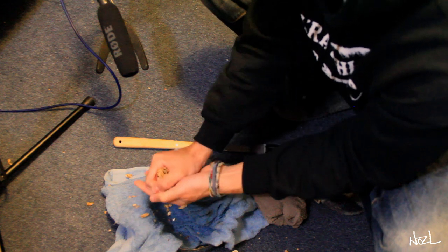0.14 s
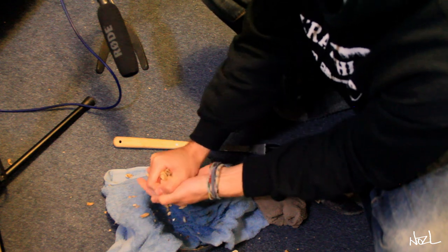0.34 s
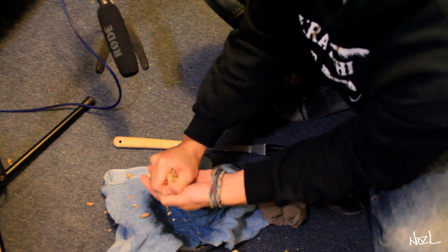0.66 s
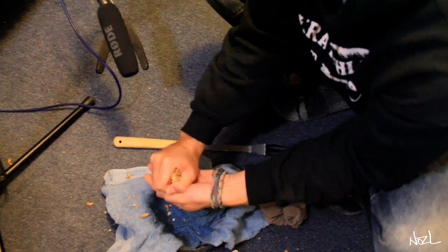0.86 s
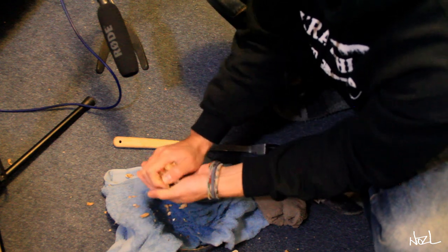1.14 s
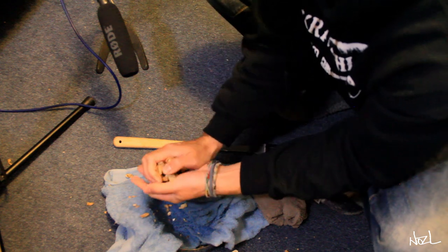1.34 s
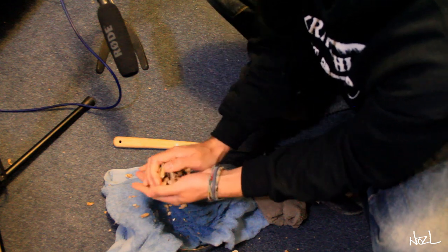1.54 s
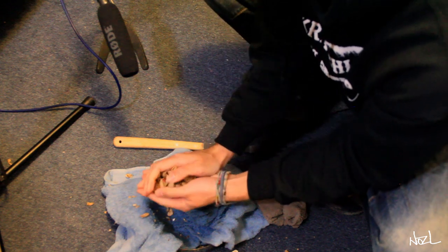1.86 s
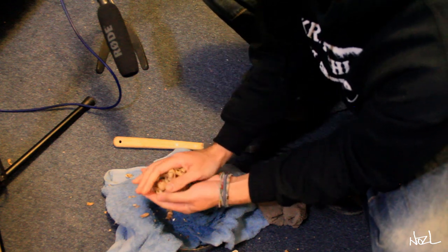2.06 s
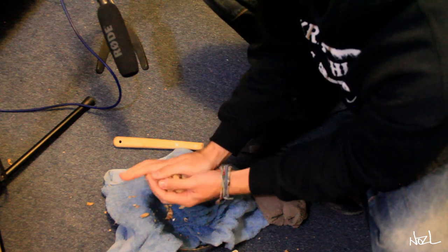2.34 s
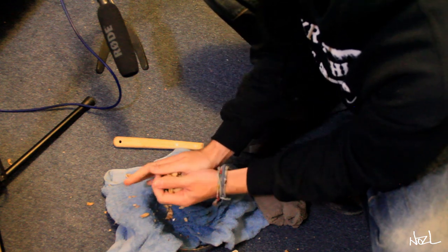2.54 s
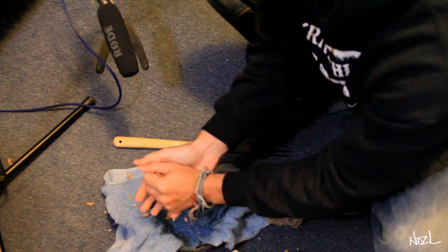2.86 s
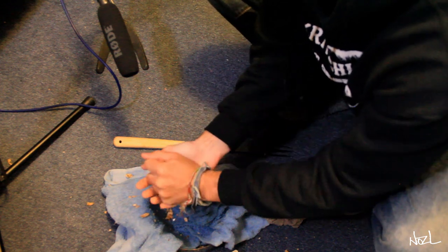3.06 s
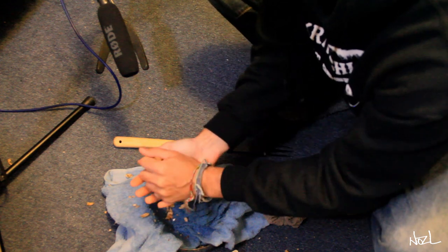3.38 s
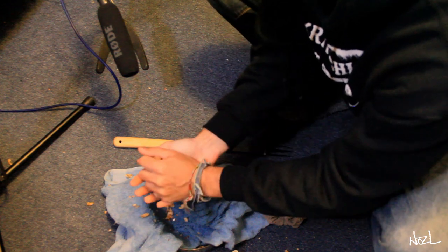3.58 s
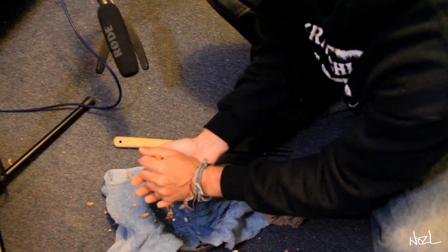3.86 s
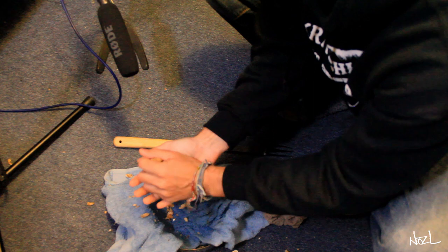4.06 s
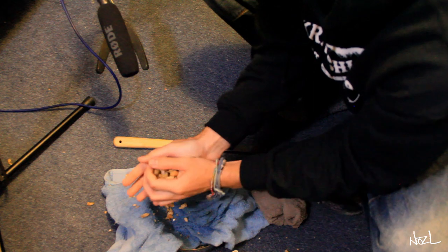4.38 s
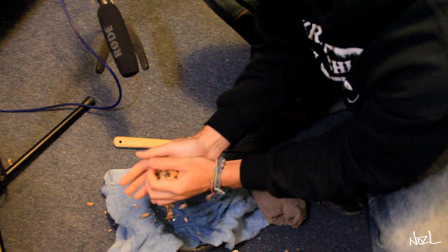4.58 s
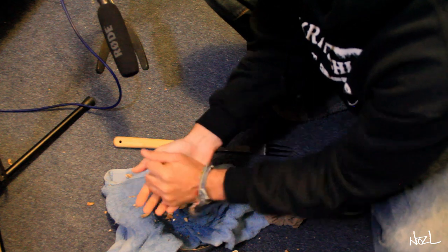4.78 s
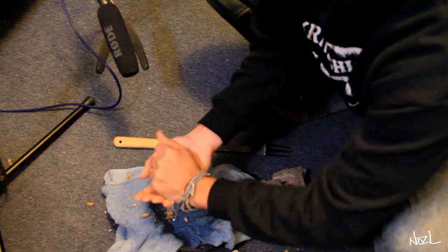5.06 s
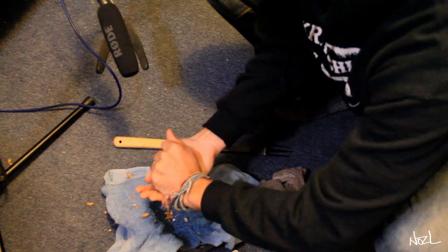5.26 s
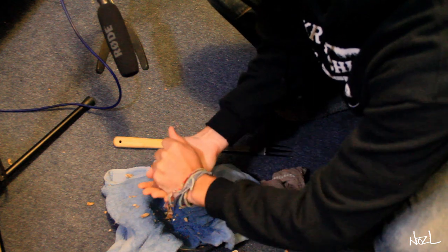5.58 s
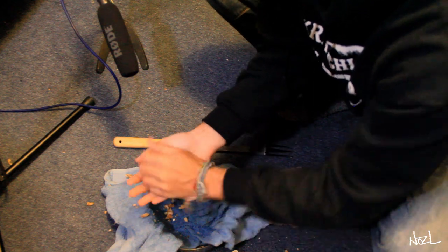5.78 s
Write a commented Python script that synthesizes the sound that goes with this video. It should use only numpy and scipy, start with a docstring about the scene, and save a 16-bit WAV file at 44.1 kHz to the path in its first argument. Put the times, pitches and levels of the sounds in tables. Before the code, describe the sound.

Dry peanut shells crack and crunch between two hands in separate bursts, close to the microphone in a small carpeted room.

```python
"""Dry peanut shells crack and crunch between two hands, close to one microphone in a small carpeted room.
Each crack is a short run of tiny breaks that rings the shell and the air pocket between the palms.
Between the cracks, loose fragments crackle and rub, louder as the hands squeeze harder.
The crackle and rub are random ticks and noise sent through ringing filters.
A low rumble and a faint hiss, both shaped noise, lie underneath."""
import sys
import numpy as np
from scipy import signal
from scipy.fft import rfft, irfft, next_fast_len
from scipy.io import wavfile

SR = 44100
rng = np.random.default_rng(int(sys.argv[2]) if len(sys.argv) > 2 else 0)


def to_wav(sig):
    """Store sig (one row per channel, or 1-D mono) as 16-bit WAV at the path in sys.argv[1].

    Samples outside -1..1 are clipped; the rate is SR.
    """
    pcm = np.clip(np.atleast_2d(sig), -1, 1) * 32767
    pcm = np.round(pcm).astype(np.int16)
    wavfile.write(sys.argv[1], SR, pcm.T)  # frames by channels


N = 261513
SIZE = 2048  # samples in one short ring
HZ = np.fft.rfftfreq(SIZE, 1 / SR)

# colour of a ringing piece of shell: (f/Hz, gain/dB)
SHELL_COLOUR = [(900, -82.5), (1950, -13.5), (2350, -3.5), (2700, -5), (3400, 0), (4200, -4), (5200, -3),
                (6300, -9.5), (8000, -28.5), (14000, -71.5)]


def amp(db):
    """Turn decibels into a gain."""
    return 10 ** (np.asarray(db) / 20)


def unit(x):
    """Scale a sound to an rms (average strength) of 1."""
    return x / np.sqrt(np.mean(x ** 2) + 1e-20)


def along(points, hz):
    """Read a curve of (f/Hz, value) points on a logarithmic frequency axis."""
    f, value = np.transpose(points)
    return np.interp(np.log(hz + 1), np.log(f + 1), value)


def filtered(x, response):
    """Change the strength of each frequency in x by response(hz)."""
    length = next_fast_len(N + SR // 2)  # spare room at the end, so that nothing wraps round
    spectrum = rfft(x, length) * response(np.fft.rfftfreq(length, 1 / SR))
    return irfft(spectrum, length)[:N]


def add(track, s, sound):
    """Mix a sound into the track from time s on."""
    start = max(round(s * SR), 0)
    track[start:start + len(sound)] += sound[:N - start]


def causal(db):
    """Give a body these gains on HZ, ringing only after it is struck (minimum phase)."""
    cepstrum = irfft(np.log(amp(db)))
    # fold the half before the strike onto the half after it
    cepstrum[1:SIZE // 2] *= 2
    cepstrum[SIZE // 2 + 1:] = 0
    return np.exp(rfft(cepstrum))


def room_tone(level_db):
    """Steady low rumble of the building with a faint hiss: noise in one fixed colour."""
    # colour of the quiet room: (f/Hz, gain/dB)
    quiet_colour = [(15, -27), (25, -8), (60, -.5), (115, -2.5), (160, -7.5), (220, -8), (350, -15),
                    (520, -21.5), (1100, -26.5), (3500, -29.5), (16000, -39)]
    noise = rng.standard_normal(N)
    return amp(level_db) * unit(filtered(noise, lambda hz: amp(along(quiet_colour, hz))))


def reflections(near_db, near_t60, room_db):
    """A fresh echo pattern: hands, sleeves and floor answer quickly, the room builds up more slowly."""
    # time the room takes to fade by 60 dB: (f/Hz, fade time/s)
    room_fade = [(300, 0.42), (1000, 0.16), (3500, 0.15), (8000, 0.11), (15000, 0.24)]
    # the room: noise in which each pitch fades at its own pace
    hz, t, bands = signal.stft(rng.standard_normal(SR // 4), SR, nperseg=256)
    fade_db = -60 * t / along(room_fade, hz)[:, None]
    room = signal.istft(bands * amp(fade_db), SR, nperseg=256)[1]
    t = np.arange(len(room)) / SR
    room *= 1 - np.exp(-t / 0.0052)
    # the near surfaces: noise from 1.5 ms on
    near = rng.standard_normal(len(t)) * amp(-60 * t / near_t60) * (t > .0015)
    echo = amp(near_db) * near / np.linalg.norm(near)
    echo += amp(room_db) * room / np.linalg.norm(room)
    # skin and cloth absorb the treble above about 6500 Hz
    soft = np.exp(-2 * np.pi * 6500 / SR)
    return signal.lfilter([1 - soft], [1, -soft], echo)


def swell(t, rise_s, hold_s, fall_s):
    """Shape of one squeeze in dB below its top, t seconds after full pressure is reached."""
    swell_db = 20  # gained over the rise, lost over the fall
    before = np.maximum(-t, 0) / rise_s
    after = np.maximum(t - hold_s, 0) / fall_s
    return -swell_db * (before + after)


def pressure():
    """Levels in dB of shell, hollow and crackle: squeezes add up, the hollow grows more slowly than the shell."""
    # squeezes and shifts of the hands:
    # (full pressure at t/s, level/dB, rise/s, hold/s, fall/s, extra hollow/dB, extra brightness/dB)
    squeezes = [(0.108, -50.5, 0.16, 0.36, 0.13, -1, 1.5), (0.671, -54, 0.2, .01, 0.15, 3.5, 4),
                (0.834, -57, 0.16, 0.023, 0.18, 3.5, 3), (1.069, -39, 0.21, 0.015, 0.36, -0.5, -1.5),
                (1.64, -58, .3, 0.025, 0.43, -4.5, -5), (2.189, -40.5, 0.13, 0.033, 0.03, -6, -7),
                (2.362, -40, .12, 0.012, 0.15, 1, -3.5), (2.54, -43.5, 0.28, 0.011, 0.05, 2, -2.5),
                (2.686, -29.5, .13, 0.21, 0.15, 0.5, 0.5), (3.176, -52.5, .12, 0.11, 0.29, 1.5, 0),
                (4.012, -53.5, 0.012, 0.23, 0.34, 6, -1.5), (4.105, -50, .02, 0.0088, 0.044, 3, 8),
                (4.458, -57.5, 0.062, 0.02433, 0.073, 5, -3.5), (4.643, -35.5, 0.068, 0.046, .1, 7, -2),
                (4.742, -25, 0.12, 0.018, 0.13, -3, -1), (4.946, -40, 0.067, .02, 0.32, -5, 3),
                (5.105, -47, 0.049, 0.008, 0.16, 3, -1.5), (5.69, -50, 0.23, 0.032, 0.14, 4, -2),
                (5.797, -46, 0.1, 0.053, 0.12, 7.5, -3)]
    rest_db = -79.5  # fragments shifting in the resting hands
    light_db = -50  # a light squeeze
    hollow_at_db, hollow_growth = -57.5, 0.89  # hollow at a light squeeze; its dB per dB of pressure

    def hollow_of(db):
        return hollow_at_db + hollow_growth * (db - light_db)

    t = np.arange(N) / SR
    power = amp([[rest_db], [hollow_of(rest_db)], [rest_db]]) ** 2
    for s, db, rise_s, hold_s, fall_s, hollow_db, bright_db in squeezes:
        level = db + swell(t - s, rise_s, hold_s, fall_s)
        squeeze = [level, hollow_of(level) + hollow_db, level + bright_db]
        power = power + amp(squeeze) ** 2
    return 10 * np.log10(power)


def piece(colour, pitch_hz, peak_db, octaves):
    """Response of one piece of shell: the colour of the material with a peak set by its size."""
    distance = np.log2((HZ + 1) / pitch_hz) / octaves
    return causal(along(colour, HZ) + peak_db * np.exp(-distance ** 2))


def hollow(pocket_hz, width_hz=160):
    """Response of the air in and around the hands to a sharp blow: a sum of resonances."""
    # fixed resonances around the hands: (f/Hz, width/Hz, level against the pocket/dB)
    fixed_modes = [(300, 250, -25), (780, 280, -15), (1155, 170, -4), (1785, 180, -2.5)]
    power = 0
    for hz, width, db in [(pocket_hz, width_hz, 0), *fixed_modes]:
        detuning = (HZ ** 2 - hz ** 2) / (width * HZ + 1)
        power = power + amp(db) ** 2 / (1 + detuning ** 2) ** 1.09
    return causal(10 * np.log10(power + 1e-12))


def gliding(force, centre_hz, pole_width_hz):
    """A resonance whose pitch moves while it rings, at rms 1."""
    # shift the moving pitch down to zero, smooth there, then shift it back up
    turn = np.exp(2j * np.pi * np.cumsum(centre_hz) / SR)
    keep = np.exp(-np.pi * pole_width_hz / SR)
    ring = signal.lfilter([1], [1, -2 * keep, keep ** 2], force / turn)
    return unit(np.real(turn * ring))


def ticks(per_second, spread_db):
    """Tiny breaks at random moments, of uneven size, at rms 1."""
    at = np.flatnonzero(rng.random(N) < per_second / SR)
    size_db = spread_db * np.minimum(rng.standard_normal(len(at)), 1.8)  # no giant ticks
    force = np.zeros(N)
    force[at] = rng.choice([-1, 1], len(at)) * amp(size_db)
    return unit(force)


def grinding(pocket_hz, shell_level, hollow_level, snap_level, rub_db, shell_db, pocket_db, around_db, snap_db, count):
    """Crumbs of several sizes break and scrape, each size at its own pitch, over a soft rubbing noise."""
    # colour of a snapping crumb: (f/Hz, gain/dB)
    crumb_colour = [(2500, -35), (5000, -11), (6800, 0), (9500, -1), (12000, -7), (16000, -17)]

    def struck(force, body):
        return signal.oaconvolve(force, irfft(body))[:N]

    shell, snap, push = np.zeros((3, N))
    for pitch_hz in np.geomspace(2400, 6000, count):
        rub = amp(rub_db) * rng.standard_normal(N)
        force = ticks(per_second=80, spread_db=5.5) + rub
        shell += struck(force, piece(SHELL_COLOUR, pitch_hz, peak_db=12.5, octaves=0.24))
        snap += struck(force, piece(crumb_colour, 2.3 * pitch_hz, peak_db=17, octaves=0.22))
        push += force
    # crumbs inside the palms sound the moving pocket; those at the fingers stir the air around
    air = amp(pocket_db) * gliding(push, pocket_hz, pole_width_hz=320)
    around = hollow(np.median(pocket_hz), width_hz=190)
    air += amp(around_db) * unit(struck(ticks(per_second=500, spread_db=1.0), around))
    sound = amp(shell_level + shell_db) * unit(shell)
    sound += amp(hollow_level) * air
    sound += amp(snap_level + snap_db) * unit(snap)
    echo = reflections(near_db=-4.5, near_t60=0.056, room_db=-9.5)
    return sound + signal.fftconvolve(sound, echo)[:N]


def splinters(shell_level, snap_level):
    """Small fractures at random moments, as strong and bright as the squeeze allows; rows as in cracks()."""
    per_s, slot_s = 32, .02  # average rate; at most one fracture starts from each slot
    level_db, spread_db = 0.5, 4  # shell ring against the squeeze
    middle_hz, pitch_spread = 3670, .18  # shell pitch; its spread (natural log)
    snap_db, hollow_db, colour_db = -5.5, -9, 8  # both against the ring; spread of both
    slots = np.arange(0, N / SR - .05, slot_s)
    luck = rng.random((len(slots), 2))
    chance = np.clip(rng.standard_normal((len(slots), 4)), -1.7, 1.7)
    rows = []
    for slot, (when, happens), (size, pitch, snap, air) in zip(slots, luck, chance):
        if happens >= per_s * slot_s:
            continue
        s = slot + when * slot_s
        now = round(s * SR)
        ring = shell_level[now] + level_db + spread_db * size
        shell_hz = middle_hz * np.exp(pitch_spread * pitch)
        brightness = snap_level[now] - shell_level[now]
        rows.append((s, ring, shell_hz, brightness + snap_db + colour_db * snap, hollow_db + colour_db * air))
    return rows


def fracture(lead_s, lead_db, spread_s, follow_db, count):
    """Spectrum of the force: a few fibres give way, the shell breaks, smaller breaks follow as the split runs on."""
    lead_delay = rng.uniform(0, lead_s, count)
    follow_delay = lead_s + rng.exponential(spread_s, count)
    delay = np.concatenate([lead_delay, [lead_s], follow_delay])
    lead = amp(lead_db) * rng.standard_normal(count)
    follow = amp(follow_db) * rng.standard_normal(count)
    size = np.concatenate([lead, [1], follow])
    return size @ np.exp(-2j * np.pi * delay[:, None] * HZ)


def cracks(rows, pocket_hz, shell_trim_db, hollow_trim_db):
    """Every fracture rings a shell piece of its own size and the air pocket, with a snap on top."""
    # colour of a snapping fibre: (f/Hz, gain/dB)
    snap_colour = [(2500, -38.5), (5000, -4.5), (6800, -1), (9000, -3.5), (12000, -3), (15500, -4.5),
                   (20000, -49)]
    middle_snap_hz, snap_scatter = 8300, 0.14  # pitch of a snapping fibre; its spread (natural log)
    lead_s, attack_s = .005, .004  # time before the main break; stretch over which levels are set
    track = np.zeros(N)
    for s, ring_db, shell_hz, snap_db, hollow_db in rows:
        force = fracture(lead_s, lead_db=-20, spread_s=.0009, follow_db=-6.0, count=7)
        snap_hz = middle_snap_hz * np.exp(snap_scatter * rng.standard_normal())
        parts = [(piece(SHELL_COLOUR, shell_hz, peak_db=9, octaves=.36), shell_trim_db),
                 (piece(snap_colour, snap_hz, peak_db=5, octaves=.4), snap_db),
                 (hollow(pocket_hz[round(s * SR)]), hollow_db + hollow_trim_db)]
        sound = np.zeros(SIZE)
        for body, db in parts:
            ring = irfft(force * body)
            attack = ring[round(lead_s * SR) - 4:][:round(attack_s * SR)]
            sound += amp(ring_db + db) * ring / np.std(attack)
        echo = reflections(near_db=-4.5, near_t60=0.07, room_db=-9.0)
        add(track, s - lead_s, sound)
        add(track, s - lead_s, signal.fftconvolve(sound, echo))
    return track


def turning(sound, before_db, after_db):
    """The upper ring of the hollow carries well at first, and less once the hands have turned over."""
    # the hands turn over, so that the other one lies on top: (start t/s, end t/s)
    turn_s = (2.6, 3.0)
    upper_hz, upper_width_hz = 1750, 340
    upper = filtered(sound, lambda hz: np.exp(-((hz - upper_hz) / upper_width_hz) ** 2))
    gain = amp(np.interp(np.arange(N) / SR, turn_s, [before_db, after_db]))
    return sound + (gain - 1) * upper


def scene():
    """The pressure of the hands drives crumbs and splinters; one microphone feeds both channels."""
    # the air pocket drops in pitch as the palms close on it: (t/s, f/Hz)
    pocket_glide = [(.1, 1146), (.6, 1200), (.85, 1480), (1.05, 1200), (2.17, 1450), (2.4, 1240),
                    (2.78, 1160), (2.86, 1060), (2.96, 850), (3.2, 1040), (4.05, 1170), (4.6, 1160),
                    (4.72, 1060), (4.78, 780), (5.03, 780), (5.65, 1160), (5.85, 1350)]
    # the fractures that stand out, levels before the trims below:
    # (t/s, shell ring level/dB, shell pitch f/Hz, snap against the ring/dB, hollow against the ring/dB)
    main_cracks = [(.0646, -37, 3130, -11, -10), (.078, -34, 3780, -5, -13), (.096, -32, 2980, -22, 1.5),
                   (.1562, -33, 3430, -2.5, -9.5), (.175, -43, 3300, -22, 6), (.181, -32, 4230, 4, -10),
                   (.1826, -22.5, 2960, -3, -7.5), (.1915, -32, 4500, -10, 0.5), (.2226, -35, 3370, -7, -7),
                   (.3182, -31, 3120, -5, -4.5), (.344, -25.5, 4500, -4.5, -11),
                   (.3494, -29, 3820, -2, -7.5), (.3802, -25, 2940, 0, -14),
                   (.4773, -29, 4530, -10.5, -10.5), (.5194, -42.5, 5300, 8.5, -8),
                   (.6025, -32, 3600, -2, -10), (.61, -50, 3800, 11, -6), (.654, -48, 4700, 3, 5),
                   (.6628, -34, 5230, -7.5, -26), (.83, -42, 3930, -2, -5.5), (.897, -41, 4060, -3, -3),
                   (.9891, -32, 4260, 1, -2), (1.0411, -35, 3400, -15, 0), (1.0968, -29, 3700, -3, -4),
                   (1.113, -32.5, 3020, -0.5, -1), (1.1873, -36, 3100, -15, -3),
                   (1.2264, -35, 3970, -4.5, -10.5), (1.4441, -38, 3300, -17, -16),
                   (1.9443, -50, 3860, -0.5, -20), (2.5377, -35, 3900, -1, -1.5),
                   (2.5467, -34.5, 4970, -7, -5), (2.6402, -22, 3200, -9, -9.5),
                   (2.6691, -31.5, 3750, 1.5, -12), (2.6755, -18, 3230, -12, -3.5),
                   (2.709, -39.5, 3420, 3.5, 1), (2.7176, -25, 4200, 2, -4),
                   (2.7312, -18.5, 5340, 0.5, -13), (2.75, -22.5, 5100, -7, -9), (2.7686, -18, 3700, 1, -4),
                   (2.7921, -25, 4230, -3, -13), (2.8184, -19.5, 5100, 1, -25),
                   (2.844, -27.5, 4300, 5, -22), (2.8596, -21.5, 4360, -4, -17),
                   (2.872, -20.5, 3600, -2, 0), (2.8765, -22.5, 4200, 6.5, -4),
                   (2.9469, -23, 3500, -5.5, -11), (2.9558, -24, 3020, -4.5, -3.5),
                   (3.0019, -27.5, 3180, -1, -21), (3.0042, -21.5, 4000, -2.5, -10.5),
                   (3.0469, -36, 3740, -7, -18), (3.147, -39.5, 3220, -8, -15),
                   (3.2619, -41, 3820, -19, -2), (3.352, -36, 5780, 3, -16.5),
                   (4.1128, -48.5, 5500, 9.5, -8), (4.6199, -23.5, 4870, -15.5, -1.5),
                   (4.6924, -23, 4000, -3.5, -6), (4.7617, -13.5, 4000, -4.5, -22),
                   (4.7662, -18.5, 3780, -3.5, -10.5), (4.77, -24, 4100, -6, -10),
                   (4.785, -23.5, 3650, -1.5, -1), (4.8302, -25.5, 3180, -2.5, -0.5),
                   (4.8519, -28, 4350, 1.5, 6), (4.8634, -34, 3570, 9.5, 1), (4.915, -26, 3600, -0.5, 2),
                   (4.9225, -22.5, 3240, -11.5, -24), (4.9346, -21, 4360, 0.5, -3),
                   (4.97, -43.5, 4300, 2, 10), (5.0229, -18.5, 3540, -10.5, -2.5),
                   (5.0301, -27, 3700, -6, -14), (5.0953, -16.5, 3400, -22, -3.5),
                   (5.139, -27, 2310, -6.5, -2.5), (5.1501, -26.5, 4000, -4, -3.5),
                   (5.2139, -35, 2440, -15, -8), (5.2219, -40, 4000, 2.5, 4.5),
                   (5.571, -46.5, 4600, -2.5, -24), (5.6803, -50.5, 3700, -10, 13.5),
                   (5.8084, -42, 3400, -2.5, 6), (5.8708, -36.5, 3630, -14, 0.5),
                   (5.8921, -28, 4270, -18, -34)]
    glide_s, glide_hz = np.transpose(pocket_glide)
    pocket_hz = np.interp(np.arange(N) / SR, glide_s, glide_hz)
    shell_level, hollow_level, snap_level = pressure()
    room = room_tone(level_db=-54.5)
    crumbs = grinding(pocket_hz, shell_level, hollow_level, snap_level,
                      rub_db=-6, shell_db=-2.0, pocket_db=-6.0, around_db=-6.5, snap_db=-6.0, count=7)
    all_cracks = [*main_cracks, *splinters(shell_level, snap_level)]
    breaks = cracks(all_cracks, pocket_hz, shell_trim_db=0.38, hollow_trim_db=-2.0)
    mono = turning(breaks + crumbs, before_db=1.0, after_db=-4.5) + room
    return np.array([mono, mono])


def record(dry):
    """The tallest peaks are rounded off; the recorder keeps nothing above its band limit."""
    top, band_limit_hz = .9, 16000  # top: the level that peaks approach, full scale = 1
    rounded = dry / (1 + (dry / top) ** 4) ** .25
    return np.array([filtered(channel, lambda hz: hz < band_limit_hz) for channel in rounded])


dry = scene()
out = record(dry)
to_wav(out)
```